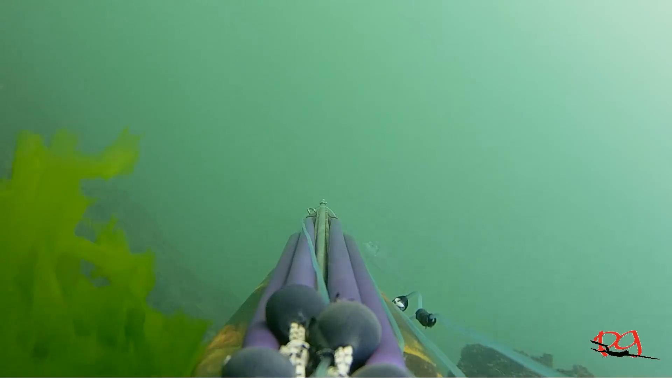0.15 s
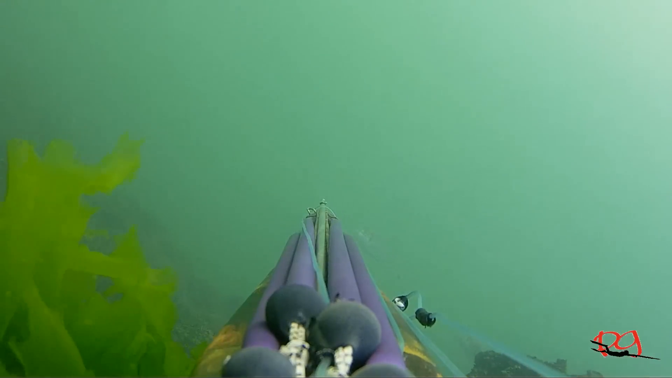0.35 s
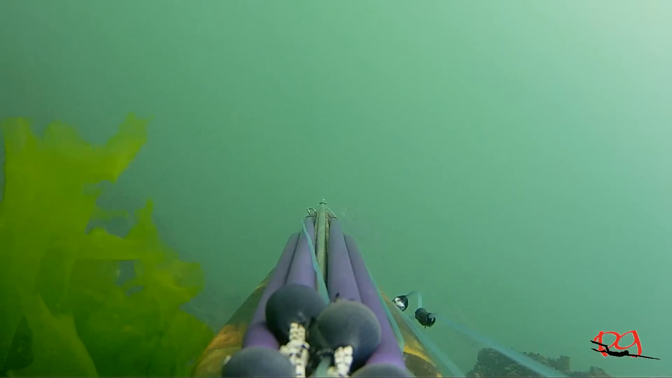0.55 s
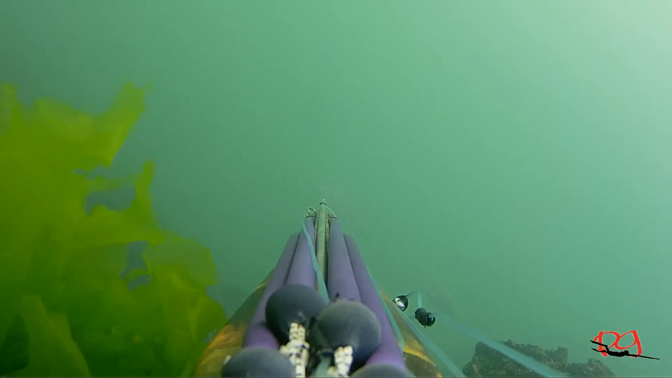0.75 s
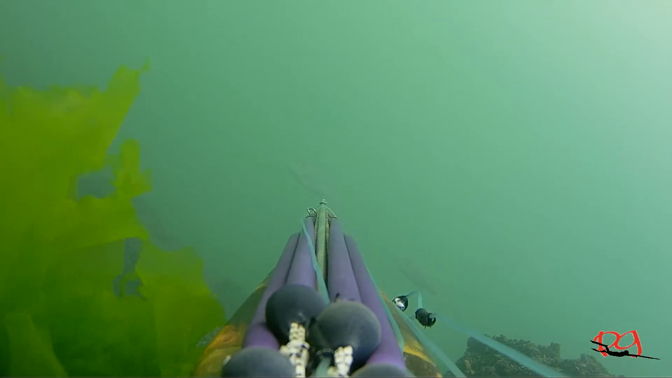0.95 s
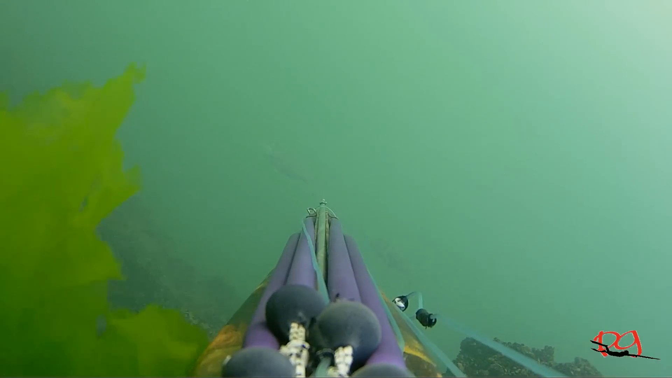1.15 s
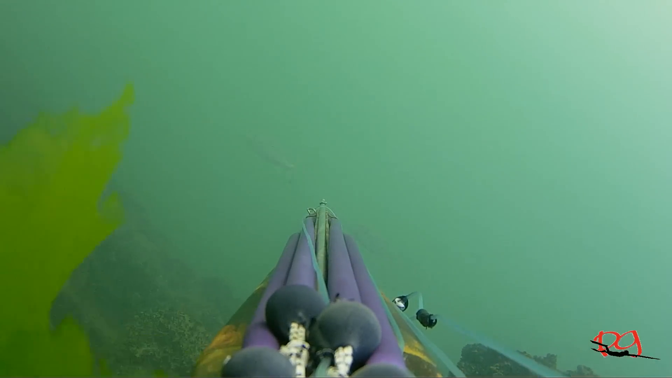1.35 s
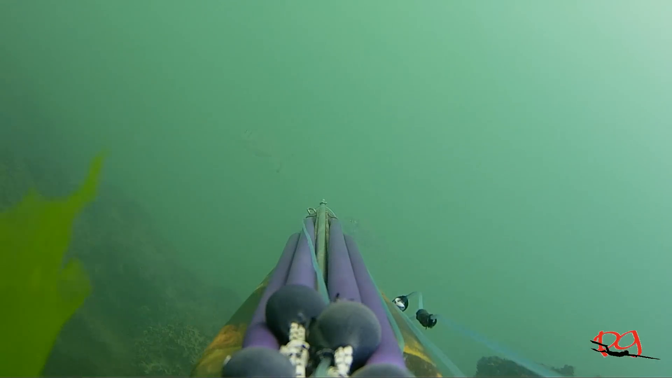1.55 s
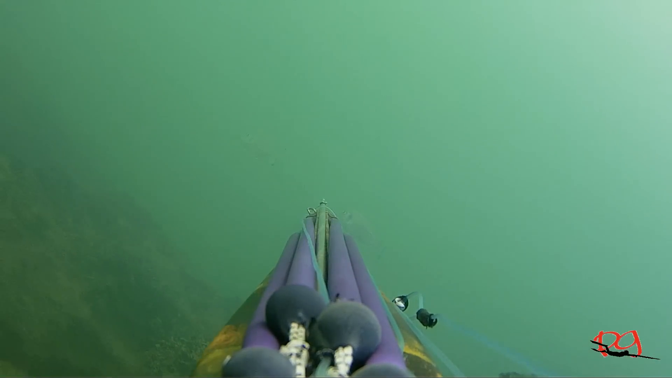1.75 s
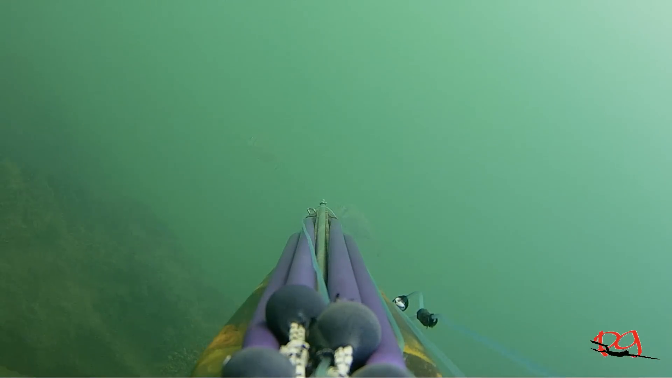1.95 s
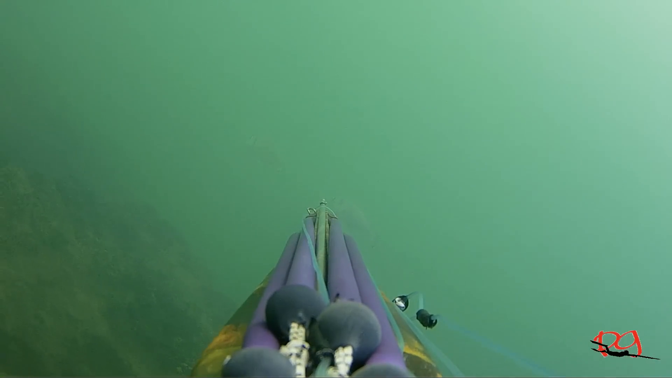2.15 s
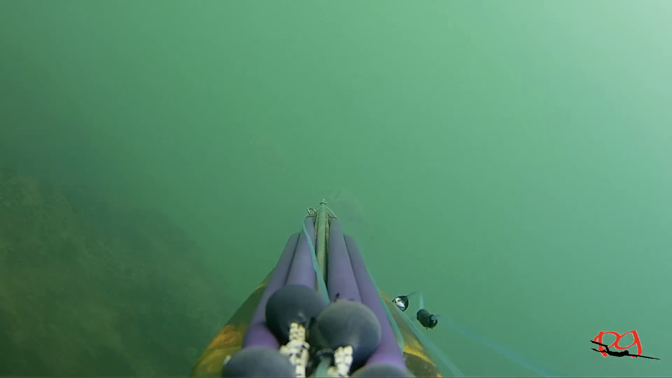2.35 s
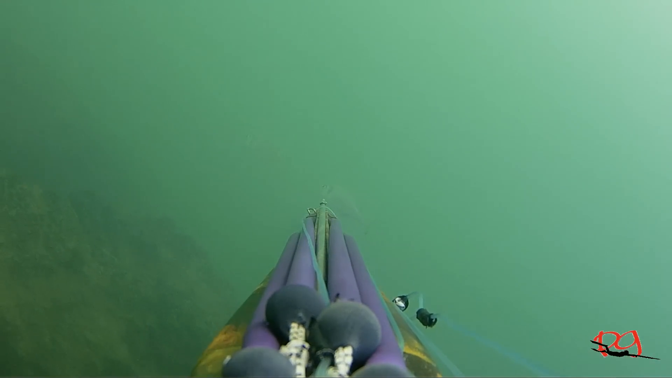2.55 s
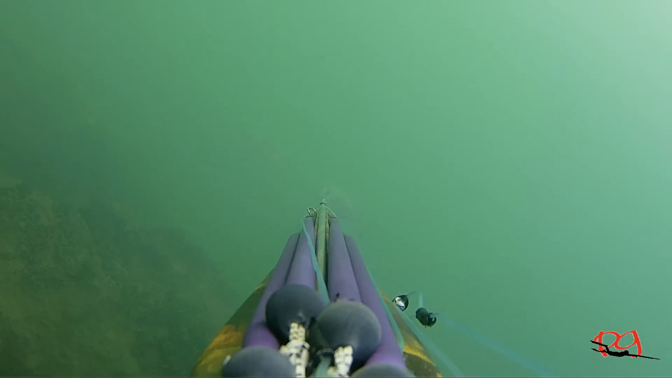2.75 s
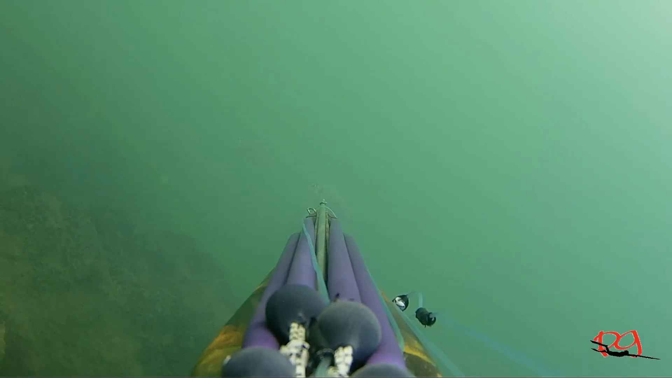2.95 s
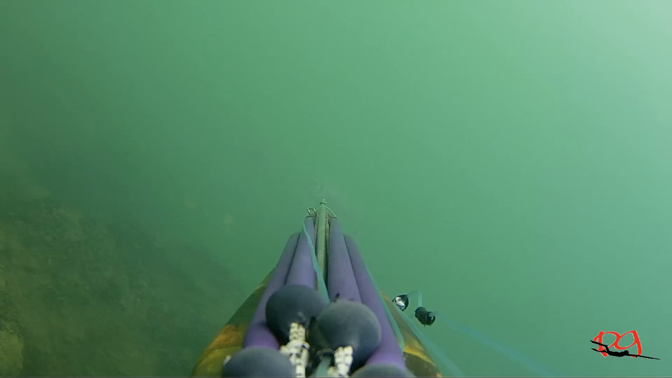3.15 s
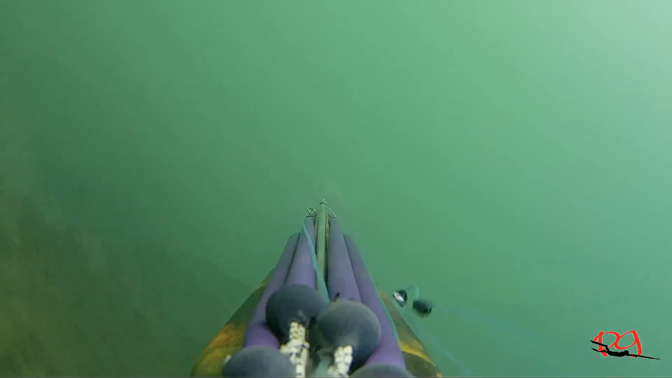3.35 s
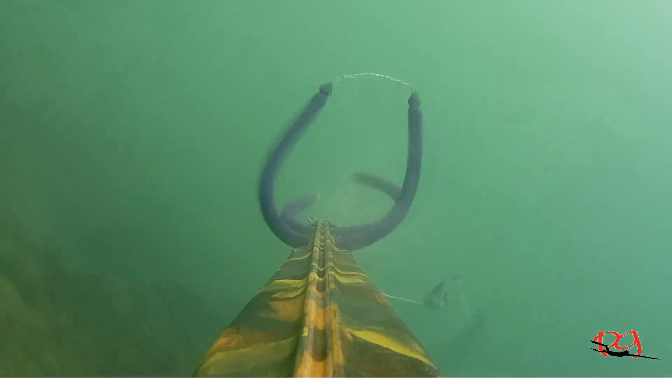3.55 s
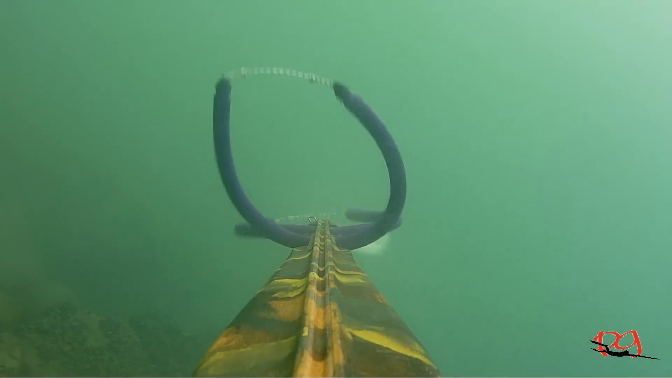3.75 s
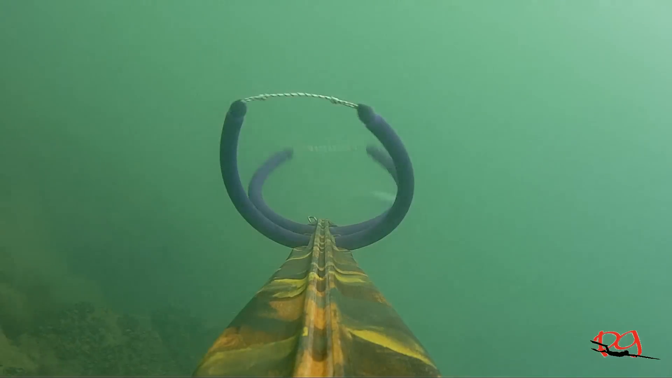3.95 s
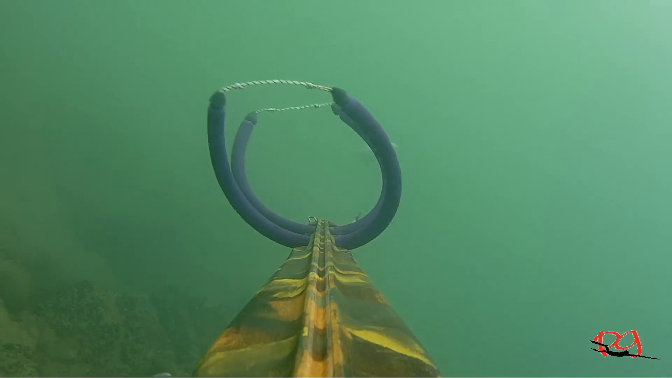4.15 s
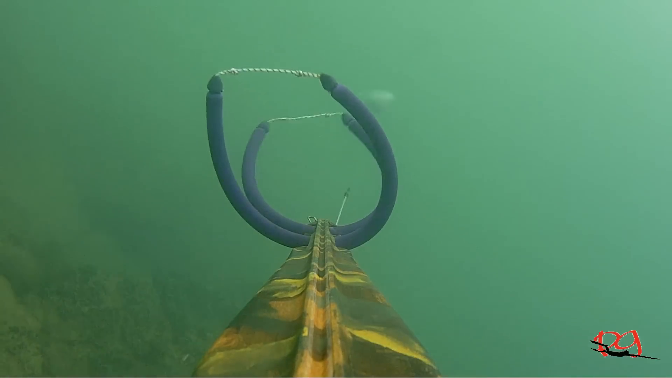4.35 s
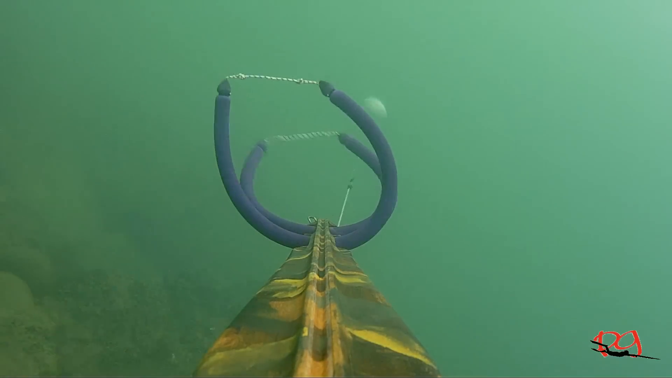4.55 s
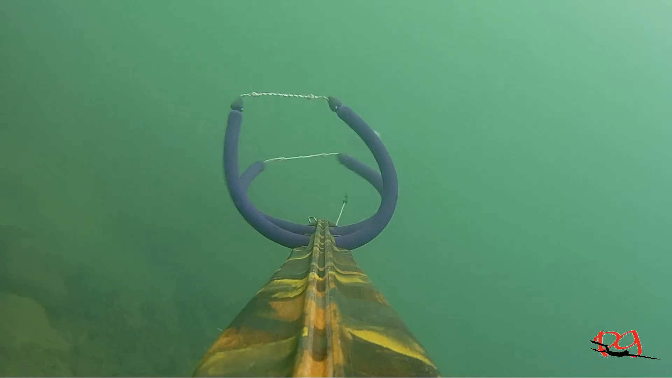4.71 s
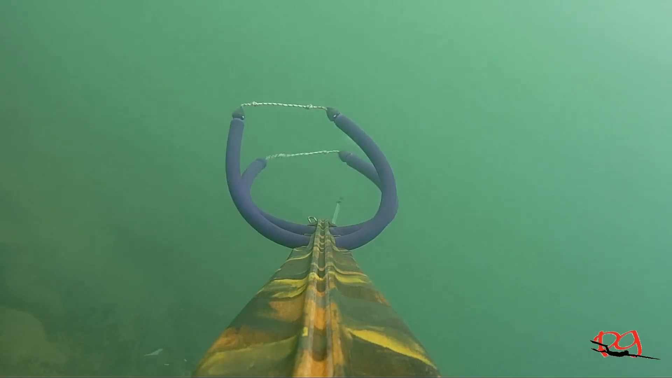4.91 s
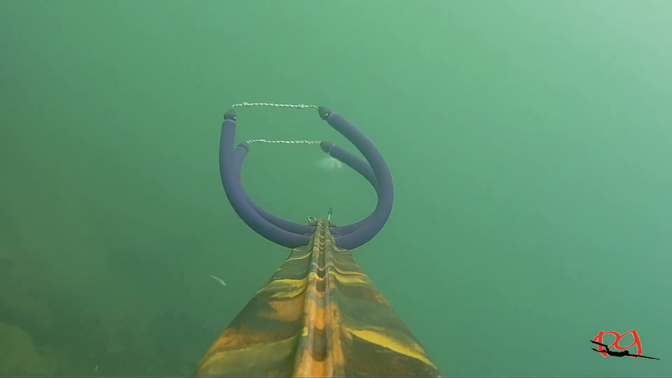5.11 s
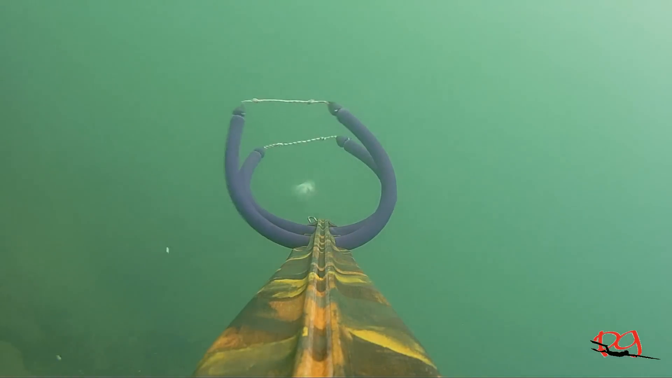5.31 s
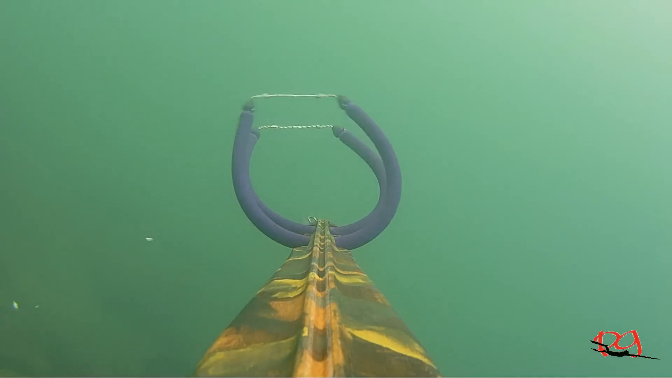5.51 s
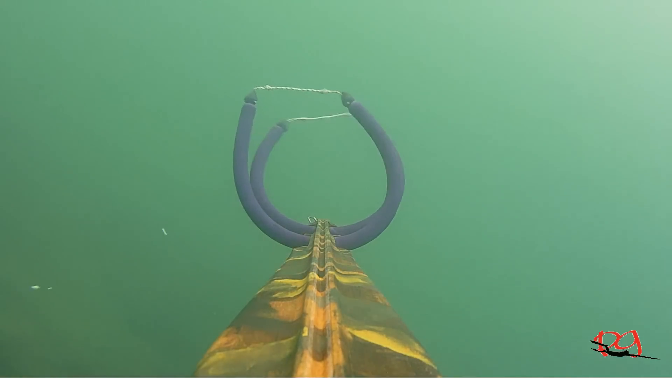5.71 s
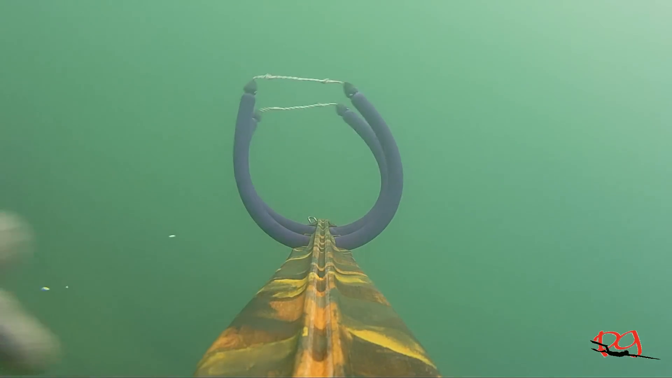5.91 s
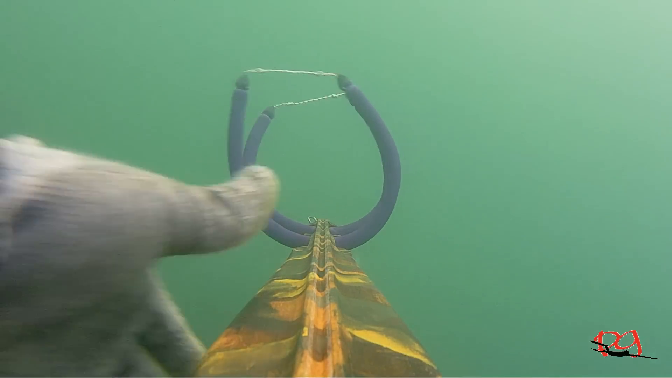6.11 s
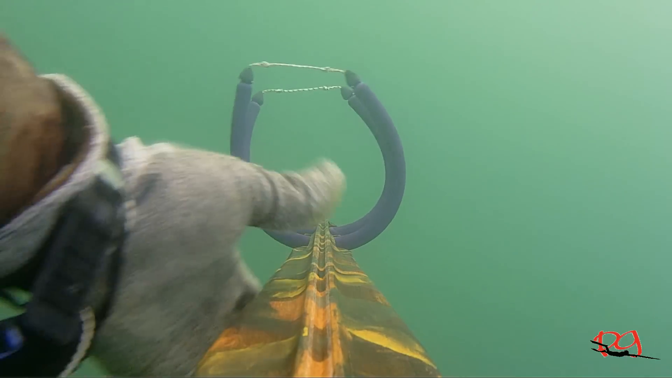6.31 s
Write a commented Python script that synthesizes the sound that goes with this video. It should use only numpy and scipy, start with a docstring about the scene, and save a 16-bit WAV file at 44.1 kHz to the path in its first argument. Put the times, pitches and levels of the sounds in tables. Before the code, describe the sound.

Quiet underwater ambience close to a housed microphone on a wooden speargun: low muffled wash, sparse shrimp snaps and fine distant crackle. Just after three seconds the gun fires with a loud, clipped, woody slam and rubber scrape, low knocks dying quickly and a tiny squeak. Then line pays out of the reel in small, uneven, slightly singing clicks while the shrimp keep snapping.

```python
"""Shrimp snap on the reef over the wash of the sea: ringing modes, bright cracks and shaped noise; a faint
swish of band noise passes. Then a speargun is fired under water, heard by a microphone in a housing fixed
on the stock: friction and blows ring the stock's modes and overload the input. Gliding tones squeak, low
knocks die away and the line comes taut; last it pays out of the reel in short rubs that ring its modes and sing."""
import sys
import numpy as np
from scipy import signal
from scipy.io import wavfile
from scipy.ndimage import uniform_filter1d

SR = 44100
rng = np.random.default_rng(int(sys.argv[2]) if len(sys.argv) > 2 else 0)


def generate_wav(sig):
    """Save sig (samples, or channels by samples) to the path in sys.argv[1] as 16-bit PCM at SR."""
    pcm = np.round(np.clip(np.atleast_2d(sig).T, -1, 1) * 32767).astype(np.int16)
    wavfile.write(sys.argv[1], SR, pcm)


N = 280917
EDGE_HZ = 15800  # upper band limit

# resonances of the wooden stock: [centre_hz, width_hz, level_db]
STOCK_MODES = [(51.6, 13, 6), (103, 62, 1.5), (227.5, 54, -1), (387.2, 91, 4), (622, 257, 1.5),
               (949, 340, -2.5), (1489, 240, 2.5), (1668, 140, 4), (1900, 140, 2.5), (2423, 300, -9),
               (2850, 610, -14), (4200, 1400, -26.5), (9200, 1800, -26.5)]


def amp(db):
    """Decibels to amplitude."""
    return 10 ** (np.asarray(db) / 20)


def evened(x):
    """Scale to rms 1."""
    return x / np.sqrt(np.mean(x ** 2) + 1e-20)


def add(mix, start_s, sound):
    """Add a sound at its start time, cut at the end of the mix."""
    part = mix[round(start_s * SR):][:len(sound)]
    part += sound[:len(part)]


def resonate(x, hz, width_hz):
    """One resonance, a decaying complex pole, of about gain 1 at its centre."""
    r = np.exp(-np.pi * width_hz / SR)
    pole = r * np.exp(2j * np.pi * hz / SR)
    return 2 * signal.lfilter([1 - r], [1, -pole], x).real


def body(force, modes, steep):
    """A force rings the modes; neighbours swing in opposite sign; steep modes filter twice."""
    out = 0
    for k, (hz, width_hz, db) in enumerate(modes):
        ring = resonate(force, hz, width_hz)
        if steep:
            ring = resonate(ring, hz, 2 * width_hz)
        out = out + (-1) ** k * amp(db) * ring * np.sqrt(100 / width_hz)
    return out


def friction(slips_per_s, spread_db, smooth):
    """Uneven slips over a smooth rub, as a force of rms 1."""
    struck = rng.random(N) < slips_per_s / SR
    size = amp(spread_db * rng.exponential(1, N).clip(0, 3))
    slips = evened(struck * size * rng.choice([-1, 1], N))
    return evened(slips + smooth * rng.standard_normal(N))


def strokes(rows, db, rise):
    """Pressure over time: each stroke swells and fades; their powers add."""
    power = np.zeros(N)
    for (start_s, length_s, *_), level_db in zip(rows, db):
        u = np.arange(0, 1, 1 / (length_s * SR))
        add(power, start_s, (amp(level_db) * np.sin(np.pi * u ** rise)) ** 2)
    return np.sqrt(power)


def followed(rows, db):
    """Pressure over time along a curve of levels; all but silent outside it."""
    times_s = np.transpose(rows)[0]
    return amp(np.interp(np.arange(N) / SR, times_s, db, left=-99, right=-99))


def rubbed(modes, split_hz, low, high, force):
    """The force drives the low and the high modes of a thing, each under its own pressure."""
    low_modes = [m for m in modes if m[0] < split_hz]
    high_modes = [m for m in modes if m[0] >= split_hz]
    out = 0
    for group, pressure in (low_modes, low), (high_modes, high):
        level = np.std(body(force, group, True))  # under steady pressure
        out = out + body(force * pressure, group, True) / level
    return out


def gun():
    """Release, recoil and the bands slapping back: friction and blows carried through the stock."""
    # single jolts: [start_s, length_s, low_modes_db, high_modes_re_low_db, hiss_re_low_db]
    jolts = [(3.321, 0.017, -24.5, -15, -28), (3.337, .014, -13.5, -2, -12),
             (3.356, 0.01, -21.5, -6, -12.5), (3.367, 0.03, 3.5, -6.5, -12.5), (3.431, 0.019, 0, -2.5, -36),
             (3.459, .0076, -19, 5.5, -30), (3.521, 0.025, -18.5, -5, -28), (3.564, .005, -35, 4, -14),
             (3.575, 0.0094, -28.5, -3, -5), (3.605, 0.025, -27, 4.5, -16), (3.625, 0.0086, -9, -4, -25),
             (3.635, .011, -17, 3.5, -24), (3.669, 0.011, -26.5, -9, -36.5),
             (4.043, 0.052, -37.5, -12, -32.5), (4.186, 0.067, -48, -4.5, -40),
             (4.236, 0.042, -45, -4.5, -40)]
    # the bands scrape along the stock and settle: [time_s, low_modes_db, high_modes_re_low_db]
    recoil = [(3.295, -44, -25), (3.312, -53, -22), (3.352, -44, 5), (3.378, -9, -8), (3.39, 9, -4.5),
              (3.415, 3.5, -4.5), (3.432, -8.5, -9), (3.455, -15, -7), (3.48, -13.5, -9),
              (3.495, -17.5, -22), (3.508, -29, -9.5), (3.548, -27.5, -15.5), (3.6, -27.5, -8.5),
              (3.665, -32, -12), (3.69, -35, -21), (3.715, -47, -10), (3.75, -51, 1)]
    # the line comes taut and drags on the stock: [time_s, low_modes_db, high_modes_re_low_db]
    tug = [(3.745, -46, -12), (3.755, -27.5, -17), (3.78, -33.5, 5), (3.8, -26.5, -6), (3.83, -33, 2.5),
           (3.848, -42, 4), (3.862, -60, -3)]
    recoil_hiss_db, tug_hiss_db = -22.5, -36  # re high modes

    _, _, db, high_db, hiss_db = np.transpose(jolts)
    low = strokes(jolts, db, .45)
    high = strokes(jolts, db + high_db, 0.35)
    spray = strokes(jolts, db + hiss_db, .42)
    for rows, under_db in (recoil, recoil_hiss_db), (tug, tug_hiss_db):
        _, db, high_db = np.transpose(rows)
        low = np.hypot(low, followed(rows, db))
        high = np.hypot(high, followed(rows, db + high_db))
        spray = np.hypot(spray, followed(rows, db + high_db + under_db))
    wood = rubbed(STOCK_MODES[2:], 1200, low, high, friction(1500, 4.0, 1.8))
    return wood + knocks() + shudder() + rubber_hiss() * spray + rocking()


def knock(peak_db, centre_hz):
    """A short blow rings the modes of the stock, most those near its own pitch."""
    blow = np.zeros(3000)
    blow[:12] = np.hanning(12)
    near = [(hz, width_hz, db - 30 * np.log2(hz / centre_hz) ** 2) for hz, width_hz, db in STOCK_MODES]
    ring = body(blow, near, True)
    return amp(peak_db) * ring / abs(ring).max()


def knocks():
    """Single blows on the stock."""
    # [start_s, peak_db, centre_hz of the modes that answer]
    blows = [(3.3266, -8, 920), (3.379, 8.5, 220), (3.435, 4, 1580), (3.444, -14, 1870), (3.466, -1, 400),
             (3.545, -7, 397), (3.627, -8, 635), (3.637, -4, 1630), (3.643, -14, 400), (3.67, -20, 1240),
             (3.682, -22, 1040), (3.751, -26, 560), (3.794, -18.5, 430), (3.799, -18.5, 397),
             (4.06, -28, 520), (4.425, -31, 397)]
    out = np.zeros(N)
    for start_s, peak_db, centre_hz in blows:
        add(out, start_s, knock(peak_db, centre_hz))
    return out


def shudder():
    """After the release the stock shudders in six low knocks that die away."""
    start_s, gap_s, first_db, slope_db_per_s = 3.39, .0125, 4.5, -160
    low_hz, high_hz = 100, 270
    out = np.zeros(N)
    for k, (late, pitch) in enumerate(rng.random(size=(6, 2))):
        after_s = gap_s * (k + .3 * late)
        centre_hz = low_hz * (high_hz / low_hz) ** pitch
        add(out, start_s + after_s, knock(first_db + slope_db_per_s * after_s, centre_hz))
    return out


def rubber_hiss():
    """Hiss of rubber through water: dense uneven slips in broad bands, rms 1."""
    # [centre_hz, width_hz, level_db]
    hiss_bands = [(2970, 880, 3.5), (4000, 340, 0), (5500, 1200, -2), (8840, 4500, -13.5),
                  (12500, 3000, -16)]
    return evened(body(friction(2500, 7.3, 0.33), hiss_bands, True))


def rocking():
    """The stock rocks after the recoil: noise in its two lowest modes."""
    # [time_s, level_db]
    sway = [(3.32, -39), (3.364, -36.5), (3.375, -2), (3.464, -14.5), (3.488, -32), (3.57, -32),
            (3.829, -53.5), (3.868, -76)]
    noise = evened(body(rng.standard_normal(N), STOCK_MODES[:2], True))
    return noise * followed(sway, np.transpose(sway)[1])


def squeak(length_s, start_hz, end_hz, lateness, db, overtones_db, last_overtones_db, loudest, unsteady):
    """A gliding tone with overtones; smoothed noise unsteadies its pitch and overtones."""
    ends_db, grit_depth = -19.5, 1.6  # swell at both ends re its peak; unsteadiness of the overtones
    u = np.arange(0, 1, 1 / (length_s * SR))
    glide = u ** lateness
    wobble, grit = uniform_filter1d(rng.standard_normal((2, len(u))), size=40)
    pitch_hz = (start_hz + (end_hz - start_hz) * glide) * (1 + unsteady * wobble)
    phase = 2 * np.pi * np.cumsum(pitch_hz) / SR
    top = min(10, int(EDGE_HZ / max(start_hz, end_hz)))
    upper = sum(amp(-40 * np.log10(k) - .25 * k ** 2) * np.cos(k * phase) for k in range(2, top + 1))
    upper_db = overtones_db + (last_overtones_db - overtones_db) * glide
    tone = np.sin(phase) + amp(upper_db) * upper * (1 + grit_depth * grit)
    off_peak = np.interp(u, [0, np.clip(loudest, .05, .95), 1], [1, 0, 1])
    swell = amp(db + ends_db * off_peak ** 1.5)
    return np.sqrt(2) * tone * swell * signal.windows.tukey(len(u), .15)


def squeaks():
    """Stick-slip squeaks of steel and rubber."""
    # [start_s, length_s, start_hz, end_hz, glide_lateness (exponent), level_db, overtones_start_db,
    # overtones_end_db, loudest_at (share of length), pitch_unsteadiness (ratio)]
    slips = [(3.338, .011, 6000, 6150, 1.5, -9.5, -40, -41, 0.43, .2),
             (3.365, 0.0082, 5200, 5340, 1.5, -4.5, -40, -41, 0.74, .15),
             (3.591, .033, 1087, 757, 2.61, -6, 3, -8, 0.78, .08),
             (3.813, .029, 4940, 1480, 1.33, -30.5, 10.5, -40, 0.79, 0.18),
             (3.839, 0.014, 826, 800, 1.5, -24.5, -40, -41, 0.29, .1),
             (4.504, 0.026, 2884, 2870, 1.7, -24, -21, -24, .45, .03),
             (4.58, .016, 3020, 2800, 1.5, -45, -30, -30, .5, .1),
             (4.596, .012, 6300, 6400, 1.5, -59, -40, -41, .5, .08),
             (4.661, .012, 6700, 6300, 1.5, -61, -40, -41, .5, .08)]
    out = np.zeros(N)
    for start_s, *settings in slips:
        add(out, start_s, squeak(*settings))
    return out


def reel():
    """The line drags over the spool in short uneven rubs; pulled hard, it sings near a mode of the reel."""
    # resonances of the reel: [centre_hz, width_hz, level_db]
    reel_modes = [(253.5, 37, -6.5), (445, 260, 2), (815, 137, 1), (1031, 113, -1), (1451, 150, -8),
                  (1617, 100, -8.5), (1959, 154, 1.5), (2160, 470, -10), (2520, 490, -14.5),
                  (3725, 700, -26.5), (8800, 1800, -36.5)]
    # the line rubs as it pays out: [start_s, length_s, level_db]
    rubs = [(4.311, 0.048, -51), (4.363, 0.043, -46.5), (4.391, .04, -33.5), (4.438, 0.034, -52.5),
            (4.486, 0.068, -37.5), (4.564, 0.069, -33.5), (4.624, 0.071, -35.5), (4.716, 0.053, -35),
            (4.774, 0.073, -35), (4.869, 0.053, -48), (4.94, 0.027, -32.5), (4.958, 0.035, -34),
            (5.02, 0.034, -34), (5.169, 0.026, -34.5), (5.186, 0.0294, -32), (5.324, 0.039, -43),
            (5.408, 0.012, -37.5), (5.42, 0.023, -31), (5.481, 0.033, -40.5), (5.636, 0.032, -33),
            (5.66, .02, -35), (5.802, .012, -54), (5.817, 0.046, -37)]
    sing_hz, flutter_db = 1970, 5
    low_db, low_db_per_db, low_lingers_s = -32, 0.26, .014  # low modes follow pressure weakly, outlast the rub

    db = np.transpose(rubs)[2]
    drift, flutter = [evened(uniform_filter1d(rng.standard_normal(N), size=300)) for _ in range(2)]
    grip = amp(flutter_db * (np.tanh(flutter) - 0.23))
    sing = np.sin(2 * np.pi * np.cumsum(sing_hz * (1 + 0.01486 * drift)) / SR)
    sing *= grip * strokes(rubs, db + 1.0 * (db + 34.5) - 2, 1.1)  # grows 2 dB per dB of rub
    lingering = [(start_s, length_s + low_lingers_s) for start_s, length_s, _ in rubs]
    low = strokes(lingering, low_db + low_db_per_db * db, 0.85)
    high = grip * strokes(rubs, db - 2.5, 0.82)
    return rubbed(reel_modes, 1200, low, high, friction(1200, 1.0, 0.94)) + sing


def snap(db, low_db, high_db, crack_db):
    """A dull push as the claw shuts, a bright crack as its bubble collapses, then scatter off the rocks."""
    # what a snap rings in the housing: [pitch_hz, level_db, t60_s]
    housing = [(950, -19, 0.0074), (1287, -3.5, 0.015), (1583, -1, 0.015), (1918, 4.5, 0.01),
               (2417, -2.5, 0.015), (2927, -8.5, 0.011), (3230, -2.5, .01), (3488, -5, 0.014),
               (3968, -2, 0.0052), (4840, -20.5, 0.011), (5740, -21, 0.0071)]
    t = np.arange(2600) / SR
    chance = rng.standard_normal((3, len(t)))
    collapse = round((.002 + 0.00022 * chance[1, 0]) * SR)  # samples after the push
    ring = 0
    for k, (hz, level_db, t60_s) in enumerate(housing):
        level_db += 2.6 * chance[1, k + 1]
        level_db += low_db if hz < 2200 else high_db if hz > 3800 else 0
        ring = ring + amp(level_db - 60 * t / t60_s) * np.sin(2 * np.pi * hz * t) * (-1) ** k
    ring = ring * np.minimum(t / 0.000662, 1)
    push = 1.16 * resonate(ring, 1900, 2600)
    path = 0.051 * chance[0] * amp(-60 * t / 0.068)  # scatter
    path[collapse] += 1
    sound = push + signal.fftconvolve(path, ring)[:len(t)]
    sound = sound / abs(sound).max() * (1 + amp(low_db)) * 0.62
    crack = resonate(resonate(chance[2], 7600, 6000), 8200, 7000) * amp(crack_db + 0.5 - 60 * t / 0.011)
    crack = .4 * crack + np.roll(crack, collapse)  # faint at the push, full at the collapse
    return amp(db) * (sound + crack)


def shrimp():
    """The near snaps, and a crackle of far ones at random times."""
    # near snaps: [start_s, level_db, dullness_db (modes under 2200 Hz), crack_db]
    near_snaps = [(0.0197, -39, -25, -20), (.1477, -39, -22, -23), (0.341, -32.5, -5, -10),
                  (.549, -39.5, -29, -19), (.662, -21.5, -8.5, -23.5), (.7099, -34.5, -4, -17),
                  (0.7797, -43, -20, -10), (0.875, -42, 7, -23), (1.015, -28.5, -27, -17.5),
                  (1.115, -46, -20, -22), (1.1408, -43.5, -14, -17), (1.2384, -31.5, -12, -28),
                  (1.2709, -18.5, -4, -27.5), (1.6107, -40, -5, -16), (1.731, -31, -5.5, -41),
                  (1.7835, -41, -21, -26), (1.8068, -46, -13, -21), (1.918, -47, -17, -25),
                  (2.016, -40, -8, -18), (2.0395, -43.5, 7, -26), (2.122, -19.5, -0.5, -21.5),
                  (2.2295, -39.5, -10, -18), (2.4394, -45, 0, -24), (2.499, -30, -0.5, -27),
                  (2.6636, -40.5, -9, -20), (2.7606, -41, -8, -23), (2.778, -42, 9, -30),
                  (2.806, -37, -2, -20), (2.8277, -32.5, -11, -27), (2.8668, -40, -15, -23),
                  (2.963, -45, -12, -10), (2.9996, -39.5, 1, -21), (3.02, -31.5, -4, -18),
                  (3.1005, -50.5, 14, -25), (3.16, -35.5, -22, -30), (3.263, -39.5, -32, -18),
                  (3.7, -33, -9, -28), (3.724, -38, -6, -31), (3.7394, -34, -4, -27), (3.851, -36, -5, -18),
                  (3.882, -42.5, 3, -23), (3.988, -42.5, -13, -14), (4.03, -44, 2, -10),
                  (4.059, -26.5, -4, -14), (4.1822, -37, -8, -16), (4.2964, -40.5, -11.5, -21),
                  (4.57, -35, 1, -20), (4.7601, -28, -16, -30), (4.933, -44, -4, -6.5),
                  (5.0057, -31, -3, -19.5), (5.0386, -39, -8, -28), (5.2414, -40, -7, -21),
                  (5.3048, -38.5, -0.5, -26), (5.3647, -42, -8.5, -20), (5.3886, -33.5, -22, -20),
                  (5.4535, -41.5, -10, -13), (5.5153, -39, 0, -24), (5.5384, -43, -6, -16),
                  (5.719, -46, -9, -28), (6.0581, -39.5, -6, -21), (6.162, -39.5, -6, -32),
                  (6.2956, -37.5, -8, -37), (6.3064, -34, 0, -22)]
    far_per_s, far_db = 80, -60.5
    out = np.zeros(N)
    for start_s, db, dull_db, crack_db in near_snaps:
        high_db = 14.5 + 0.59 * crack_db - 0.4 * dull_db  # rises with the crack, sinks with dullness
        add(out, start_s, snap(db, dull_db, high_db, crack_db))
    for when, size, tilt in rng.random((round(far_per_s * N / SR), 3)):
        db = far_db - 4.9 * np.log(1.02 - size)  # few loud, many soft
        add(out, when * N / SR, snap(db, -22 * tilt, 4, -20.0))
    return out


def swish():
    """Soft noise in two narrow bands swells and fades."""
    # [start_s, length_s, level_db]
    passes = [(2.16, .1, -62), (2.22, 0.12, -57), (2.3, 0.43, -63.5), (2.72, 0.14, -60)]
    # [centre_hz, width_hz, level_db]
    bands = [(1910, 310, -1), (2430, 350, -2)]
    noise = evened(body(rng.standard_normal(N), bands, True))
    return noise * strokes(passes, np.transpose(passes)[2], .8)


def wash():
    """Sea wash and microphone hiss: random spectra with faint patches."""
    # spectrum: [freq_hz, relative_level_db per Hz]
    colour_points = [(12, -40.5), (20, 2.5), (74, -4), (168, -0.5), (410, -2.5), (897, -9), (1090, -12.5),
                     (2390, -21), (2820, -23.5), (3440, -25.5), (5530, -31), (14700, -39), (16000, -44)]
    rms_db, patch_db = -50.5, 1.1
    frames, hz = N // 256 + 5, np.fft.rfftfreq(1024, 1 / SR)
    real, imag, patches = rng.standard_normal((frames, 513, 3)).T
    patches = uniform_filter1d(patches, size=12, axis=0)  # over frequency
    patches = evened(uniform_filter1d(patches, size=14, axis=1))  # over time
    f, db = np.transpose(colour_points)
    colour_db = np.interp(np.log(hz + 1), np.log(f + 1), db)[:, None]
    spectra = (real + 1j * imag) * amp(colour_db + patch_db * patches)
    noise = signal.istft(spectra, nperseg=1024, noverlap=768)[1][:N]
    return amp(rms_db) * evened(noise)


def scene():
    """All layers, as one channel."""
    mix = gun() + squeaks() + reel() + shrimp() + swish() + wash()
    return mix[None]


def record(dry):
    """The input stage clips hard; then the band limit."""
    overload = .37  # ceiling, full scale = 1
    clipped = dry / (1 + abs(dry / overload) ** 8) ** (1 / 8)
    lowpass = signal.firwin(511, EDGE_HZ, window=("kaiser", 9), fs=SR)
    return signal.oaconvolve(clipped, lowpass[None], "same")


dry = scene()
out = record(dry)
generate_wav(out)
```